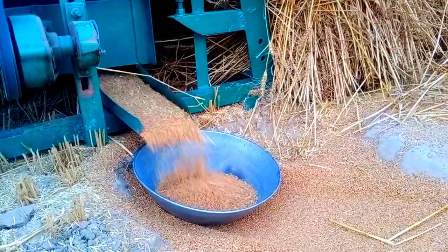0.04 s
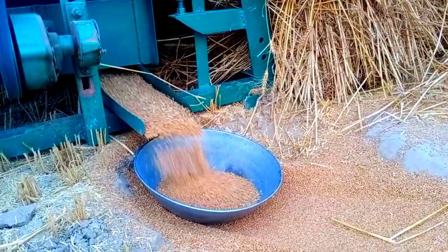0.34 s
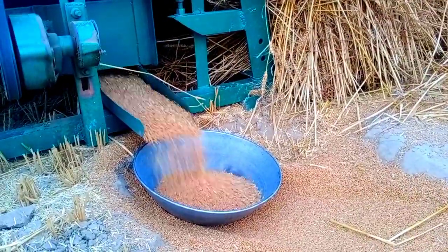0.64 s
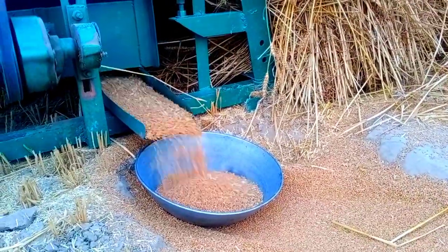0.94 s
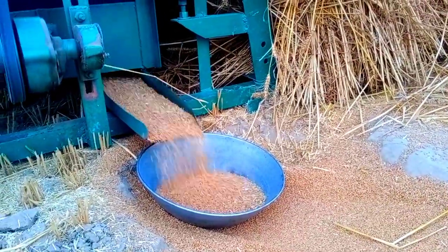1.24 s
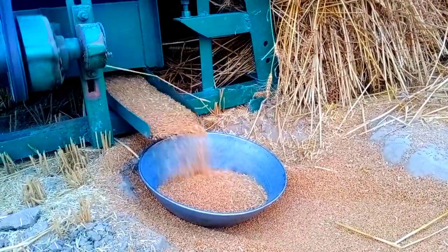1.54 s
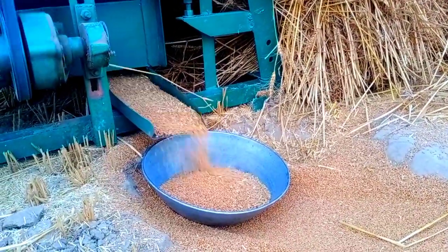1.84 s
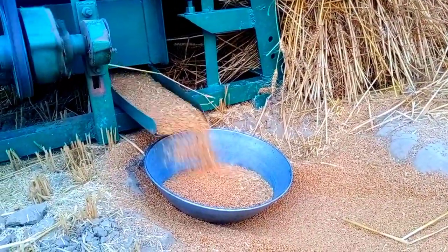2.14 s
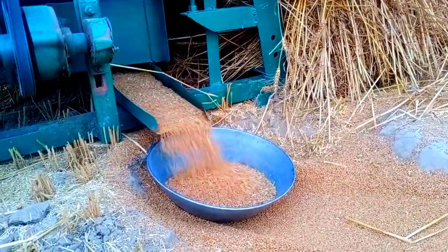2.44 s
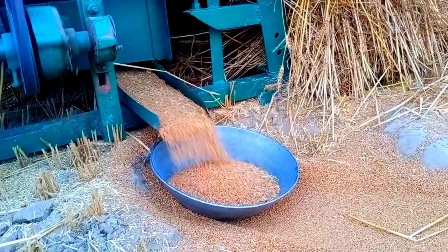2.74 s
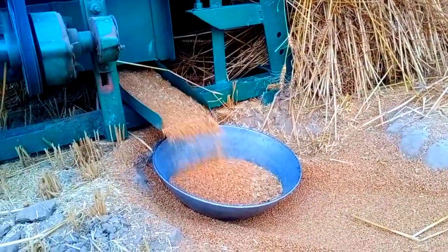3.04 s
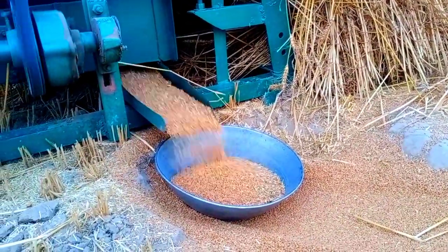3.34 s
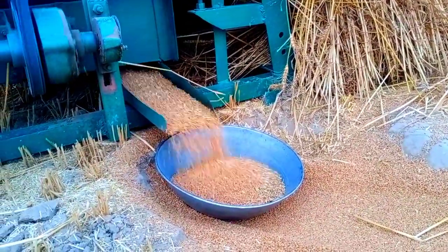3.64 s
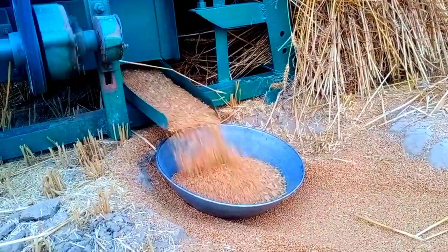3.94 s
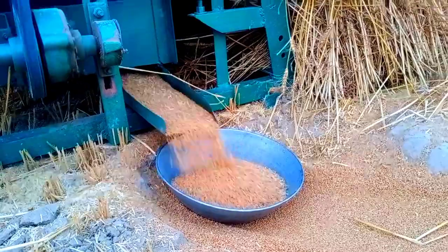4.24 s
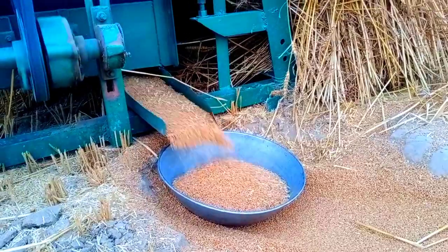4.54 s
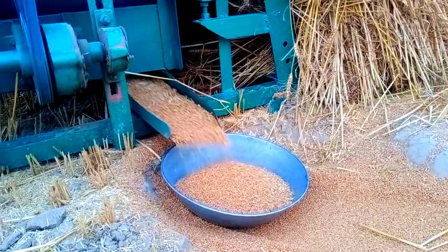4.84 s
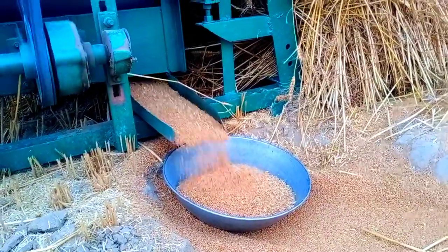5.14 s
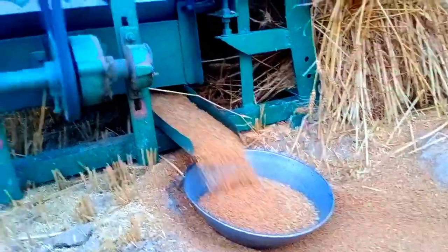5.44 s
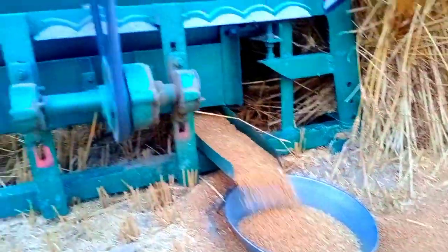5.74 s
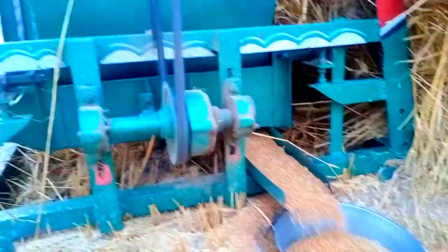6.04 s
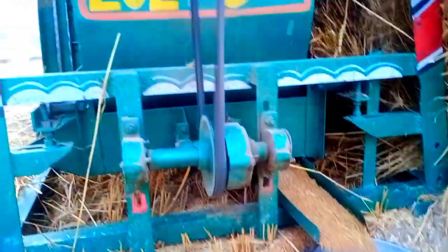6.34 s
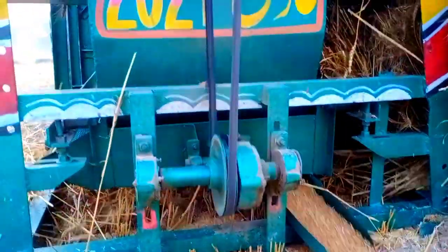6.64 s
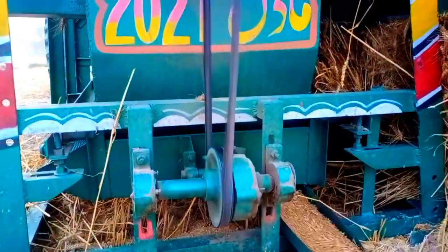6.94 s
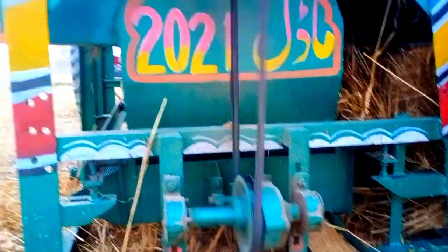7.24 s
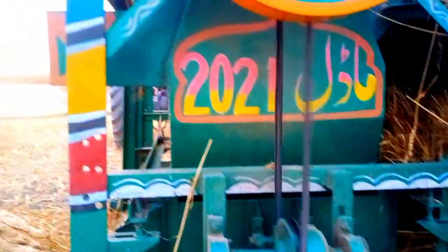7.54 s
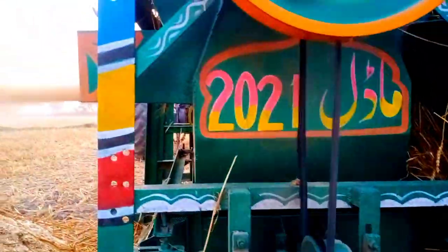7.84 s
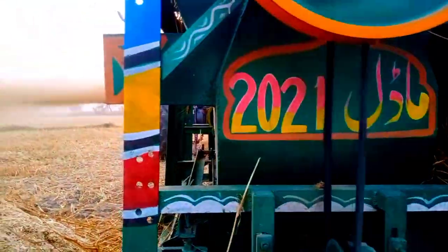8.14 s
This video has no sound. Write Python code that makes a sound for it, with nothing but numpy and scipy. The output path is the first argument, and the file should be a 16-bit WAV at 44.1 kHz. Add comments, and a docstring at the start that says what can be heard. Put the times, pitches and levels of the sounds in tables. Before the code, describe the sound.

A diesel tractor engine runs throughout with a low, throbbing hum, joined by the fan-like roar of the thresher it drives, outdoors and close by. The thresher's sieve knocks about twelve times a second, with uneven thuds, sheet metal clacks and clinks of loose steel. Straw and chaff rush and crackle through the casing, and grain trickles into a metal pan as a faint, high patter with occasional ticks. Around 2 seconds the engine's pitch sags as straw loads the drum, and the rustling briefly brightens. It recovers slightly, then labours and drops further between 4 and 5 seconds. A stalk scrapes briefly on steel at about 5 seconds. The engine then climbs back to speed, while the knocks come harder and more often from 6 to nearly 8 seconds. The pitch starts to sag again at the end, around 8.4 seconds, with everything still running.

```python
"""A low diesel throb and a fan-like roar, outdoors: a tractor drives a wheat thresher through belts.
Periodic exhaust puffs give a harmonic hum, whose pitch sags whenever straw loads the drum; turbulence
at the drum gives the roar. The sieve knocks to and fro about twelve times a second, and its blows
excite the modes of the steel. Chaff rushes through the casing and, at the chute close by, grain
trickles into a pan: both are sums of many small random impacts."""
import sys
import numpy as np
from scipy import signal
from scipy.fft import rfft, irfft, next_fast_len
from scipy.io import wavfile
from scipy.ndimage import uniform_filter1d, minimum_filter1d

SR = 44100
rng = np.random.default_rng(int(sys.argv[2]) if len(sys.argv) > 2 else 0)


def wav_record(signal):
    """Record a signal, one row per channel, as 16-bit PCM in the file named by sys.argv[1]."""
    frames = np.transpose(np.atleast_2d(signal))
    bounded = np.clip(frames, -1, 1)
    # unit amplitude maps onto the largest positive 16-bit level
    quanta = np.round(bounded * 32767).astype(np.int16)
    wavfile.write(sys.argv[1], SR, quanta)


N = 370871
TIME = np.arange(N) / SR

# Spectra of the noises. Each row: frequency in Hz, relative spectral density in dB.
CLICK_SPECTRUM = [(3000, -14.5), (5000, 1), (9000, -3), (12000, 2), (16000, -1)]  # faint broadband clicks in the high treble
HUSK_SPECTRUM = [(2500, -21), (3450, -9), (3750, -0.5), (4050, -13.5), (4600, -13), (6500, -17),
                 (8000, -32.5)]  # dry husks sliding over the sieve
GRAIN_SPECTRUM = [(4000, -26), (7000, -26.5), (10500, -30), (12000, -3.5), (13500, 3), (15000, 5),
                  (16000, -2)]  # falling grain
SCRAPE_SPECTRUM = [(700, -20), (1200, 0), (1650, 2), (1950, -4), (2550, -5), (2900, -16), (3400, -18.5),
                   (3800, -29), (4700, -43), (7000, -67)]  # a stalk on steel
RUSH_SPECTRUM = [(200, -42.5), (350, -4), (450, -3), (590, -4), (740, -1.5), (920, -6), (1080, -5.5),
                 (1250, -5), (1520, -6), (1850, -20), (2300, -49.5), (3000, -37.5), (6000, -62)]  # chaff in the casing
HISS_SPECTRUM = [(900, -15.5), (1700, -4), (2200, 10.5), (2600, -1), (3100, -13.5), (3750, -12),
                 (4150, -18.5), (5600, -16), (6600, -19.5), (7300, -31), (10000, -43.5), (16000, -43.5)]  # dry straw
THUD_SPECTRUM = [(250, -17.5), (420, 1), (560, -1), (720, 0.5), (950, -9), (1400, -23), (3000, -67)]  # the struck frame
CLACK_SPECTRUM = [(750, -17), (1150, 4.5), (1500, 4.5), (1800, -4), (2150, -13.5), (2500, -22), (3000, -35),
                  (3700, -33), (4500, -52.5)]  # struck sheet metal
ROAR_SPECTRUM = [(20, -39), (44, -32.5), (58, -4), (74, -1), (110, 1), (135, -1), (158, -1), (182, 4.5),
                 (215, -5.5), (260, -10), (330, -17), (450, -20), (900, -82.5)]  # air around the drum

# The brightest kernels on bare metal. Each row: start in seconds, frequency in Hz, level in dB.
KERNEL_HITS = [(.286, 14500, -41), (.325, 10700, -61), (.352, 10600, -57), (.687, 14200, -47),
               (0.819, 10760, -57), (1.151, 14900, -49), (1.239, 13400, -57), (1.89, 10760, -61.5),
               (2.614, 14500, -46), (4.141, 14400, -47), (4.906, 15300, -47), (5.937, 14400, -50),
               (6.439, 13500, -49), (7.016, 13600, -52), (7.279, 15400, -44)]
# Chaff in the blower. Each row: time in seconds, rush level in dB, straw hiss level in dB.
CHAFF_LEVELS = [(0.0, -34.5, -57.5), (.8, -35, -57), (2.25, -34, -50), (2.6, -35.5, -58), (3.3, -33.5, -55),
                (4.3, -35, -53), (4.9, -35.5, -57), (5.25, -37.5, -58.5), (6.1, -36.5, -64),
                (6.6, -35.5, -63.5), (7.3, -36.5, -61.5), (7.8, -34.5, -68.5), (8.41, -33, -66)]
# Filter on the stalks' rattle against the casing. Each row: frequency in Hz, relative gain in dB.
RATTLE_RESPONSE = [(1700, 3), (2150, 6.5), (2450, 0), (2750, -4), (3100, -12), (3400, -12), (3750, -14.5),
                   (4200, -28.5), (8000, -45)]
# Modes of the steel. Each row: frequency in Hz, relative level in dB, 60 dB decay time in seconds.
SCRAPED_MODES = [(1567, 3, .04), (2073, 0, .05), (2440, 4, .1), (2590, -4, .05), (2902, -7, .07),
                 (3030, -9, .07), (3338, -6, .06), (3731, -13, .05)]  # excited by scraping straw
PANEL_MODES = [(490, 0, .05), (700, 0, .05), (800, -3, .05), (1160, -5, .05), (1260, -2, .06),
               (1350, -4, .05), (1480, -2, .06), (1640, -6, .05), (1810, -11, .05), (2080, -14, .06),
               (2220, -16, .06), (2442, -19, .2), (3333, -14, .2), (3700, -12, .06)]  # panels and sieve under a clatter
# Loose parts that keep chattering. Each row: frequency in Hz, level in dB relative to the straw hiss.
LOOSE_PARTS = [(1800, 5.5), (1930, 9), (2060, 13.5), (2210, 11.5), (2442, 1.5), (2760, -6), (3333, -10.5),
               (3720, -8.5)]
# The loudest clinks of loose steel. Each row: start in seconds, frequency in Hz, level in dB,
# 60 dB decay time in seconds, roughness from 0 to 1.
LOUD_CLINKS = [(0.153, 2780, -46, 0.06, 0.1), (0.229, 2180, -41, 0.084, 0.6), (.297, 3430, -61, 0.09, 0.1),
               (.31, 2350, -42, .11, 0.3), (.383, 2060, -40.5, .08, .4), (.539, 3340, -52.5, 0.12, 0.05),
               (.705, 2550, -52, 0.15, 0.6), (.772, 2140, -38, 0.12, 0.5), (.77, 3320, -56, 0.088, 0.03),
               (.99, 2150, -38.5, 0.14, .5), (1.0, 3320, -47.5, 0.12, 0.05), (1.79, 2100, -42.5, .1, 0.44),
               (1.907, 2170, -36.5, .11, .4), (2.066, 4540, -47, .04, .2), (2.068, 2150, -37, 0.11, 0.35),
               (2.25, 2280, -39.5, .1, .5), (3.29, 2310, -41, 0.15, 0.54), (3.868, 2840, -49, .12, .4),
               (4.125, 2600, -45.5, 0.12, 0.44), (4.128, 3640, -55.5, .08, 0.4), (4.7, 2310, -44, .08, .6),
               (4.91, 2440, -45.5, .09, .4), (6.06, 2010, -45, 0.09, 0.3), (6.22, 1880, -38.5, .1, 0.5),
               (6.39, 2080, -43, 0.08, .4), (6.467, 1996, -35.5, 0.11, 0.77), (6.541, 2060, -42, 0.067, .5),
               (6.692, 2540, -42, 0.14, 0.64), (6.856, 2730, -45, .08, .7), (6.857, 2120, -35, 0.072, .5),
               (6.91, 2050, -44, 0.068, .5), (7.02, 2150, -40, .1, .4), (7.168, 2700, -50, 0.068, .6),
               (7.222, 1454, -30, .07, .3), (7.252, 2056, -38, .07, 0.34), (7.33, 2050, -45, .07, .4),
               (7.404, 1850, -36.5, 0.077, .3), (7.72, 1780, -33, 0.08, 0.2)]
# The sieve's hardest knocks. Each row: start in seconds, frame thud in dB, sheet metal clack in dB.
HARD_KNOCKS = [(.004, -24.5, -22.5), (0.154, -26, -34.5), (0.304, -29, -30), (0.382, -37, -32.5),
               (0.458, -34, -40.5), (0.615, -32.5, -36), (.77, -35, -33.5), (1.536, -35, -30.5),
               (1.612, -37, -31.5), (2.004, -39.5, -28.5), (2.064, -40, -30), (2.324, -25, -40.5),
               (2.664, -35, -30), (2.816, -27.5, -33), (3.225, -37.5, -34), (3.305, -26.5, -39.5),
               (3.477, -33.5, -33), (3.627, -25, -29), (4.121, -28.5, -26.5), (5.349, -27.5, -34.5),
               (5.985, -23.5, -37), (6.062, -25.5, -33.5), (6.141, -28, -34.5), (6.225, -27.5, -35),
               (6.466, -25.5, -30), (6.54, -29.5, -31), (6.625, -27, -37.5), (6.691, -30, -33),
               (6.857, -28, -32), (6.954, -30, -36.5), (7.016, -27, -41), (7.246, -38, -33.5),
               (7.326, -26, -30.5), (7.405, -33.5, -33.5), (7.478, -30.5, -32), (7.567, -27.5, -33.5),
               (7.647, -44, -31), (7.723, -36, -36.5), (8.186, -34, -43), (8.261, -40, -42),
               (8.337, -33, -39)]

# Shadow of the steel side as the listener moves. Each row: time in seconds, treble gain in dB.
TREBLE_SHADOW = [(6.4, -3.5), (7.0, -5.5), (7.8, -4.5), (8.41, -5)]
# Two bands where reflections interfere with the direct sound, moving with the listener.
# Each row: time in seconds, centre frequency in Hz, gain at the centre in dB.
LOW_NOTCH = [(0, 970, -3.5), (4.3, 986, -3), (4.7, 1015, -8.5), (6.1, 1044, -6.5), (6.5, 894, -3.5),
             (7.5, 883, -5)]
HIGH_NOTCH = [(6.1, 1900, 2), (6.6, 1886, -4.5), (7.15, 1820, -5.5), (7.45, 1404, -1.5), (7.8, 1420, -14),
              (8.41, 1410, -18)]

# Three armfuls of straw load the drum. Each row: time in seconds, load from 0 to 1.
DRUM_LOAD = [(0, 0.19), (1.2, 0), (1.75, 0.18), (2.08, 0.49), (2.45, 0.12), (3.65, 0.15), (4.0, 0.78),
             (4.2, 0.86), (4.36, 0.9), (4.52, 0.01), (5.5, 0), (7.7, 0.02), (8.41, 0.42)]
# Faint tones of the drum and fan. Each row: multiple of the firing rate, level in dB.
WHIRR_TONES = [(1.68, -45), (5.65, -47), (6.25, -53.5)]
# Engine speed, sagging under load. Each row: time in seconds, firing rate in Hz.
FIRING_RATE = [(0.0, 51.15), (0.36, 50.94), (0.75, 51.14), (1.28, 50.84), (1.71, 50.04), (2.24, 47.43),
               (2.55, 47.23), (3.03, 47.96), (3.67, 48.6), (3.96, 48.05), (4.49, 45.18), (4.84, 44.88),
               (5.33, 45.7), (6.37, 48.75), (7.12, 50.38), (7.77, 50.78), (8.41, 48.11)]
# Exhaust hum. Each row: harmonic number, level in dB unloaded at the usual speed, dB added per Hz of
# extra firing rate, dB added by full load, roughness from 0 to 1.
HUM_HARMONICS = [(1, -36, 1.7, -4.5, 0.05), (2, -18.5, 0.61, -11.5, 0.09), (3, -26, -1.5, 4.5, 0.14),
                 (4, -32, 1, 12, .2), (5, -35, 1.32, -3, .28), (6, -37.5, -0.13, 4, .32)]
# The buzz above the hum. Each row: harmonic number, base level in dB.
BUZZ_HARMONICS = [(7, -46), (8, -45.5), (9, -48), (10, -50.5), (11, -54)]
# Rise and fall of that buzz. Each row: time in seconds, gain in dB.
BUZZ_GAIN = [(0, -4.5), (1.1, -18), (1.7, 3.5), (3.7, 3), (5.3, -2.5), (7.1, 3.5), (8.41, 6.5)]


def amp(db):
    """Amplitude grows tenfold for every 20 dB."""
    return 10 ** (np.asarray(db) / 20)


def unit(x):
    """Normalisation to rms 1."""
    return x / np.sqrt(np.mean(x ** 2) + 1e-20)


def curves(rows):
    """Linear interpolation in time of each column after the first."""
    s, *columns = np.transpose(rows)
    return [np.interp(TIME, s, column) for column in columns]


def colour(x, spectrum):
    """Filtering as multiplication in the frequency domain; rms 1."""
    size = next_fast_len(N + 4096)
    hz, db = np.transpose(spectrum)
    gain = amp(np.interp(np.log(np.fft.rfftfreq(size, 1 / SR) + 1), np.log(hz), db))
    return unit(irfft(rfft(x, size) * gain, size)[:N])


def noise(spectrum):
    """Filtered white noise takes on the spectrum of its filter."""
    return colour(rng.standard_normal(N), spectrum)


def wander(rate_hz):
    """Low-passed noise gives a slow random fluctuation of rms 1."""
    size, control_hz = 4096, 400
    hz = np.fft.rfftfreq(size, 1 / control_hz)
    slow = irfft(rfft(rng.standard_normal(size)) / (1 + (hz / rate_hz) ** 2))
    return unit(np.interp(TIME, np.arange(size) / control_hz, slow))


def patchy(x, depth_db):
    """Random spectral modulation, in patches a few hundred Hz wide and some 60 ms long; rms 1."""
    spectra = signal.stft(x, nperseg=1024, noverlap=768)[2]
    field = uniform_filter1d(rng.standard_normal(spectra.shape), size=6, axis=0)
    field = uniform_filter1d(field, size=11, axis=1)
    spectra = spectra * amp(depth_db * unit(field))
    return unit(signal.istft(spectra, nperseg=1024, noverlap=768)[1][:N])


def impacts(per_s, spread_db):
    """Shot noise: independent impulses of uneven size; rms 1."""
    size = amp(spread_db * np.minimum(rng.exponential(1, N), 4)) * rng.choice([-1, 1], N)
    return unit(size * (rng.random(N) < per_s / SR))


def add(mix, s, sound):
    """Superposition of a sound on the mix, starting at s seconds."""
    part = mix[max(round(s * SR), 0):][:len(sound)]
    part += sound[:len(part)]


def swell(age, rise, decay):
    """Envelope of a damped vibration: a quick rise, then exponential decay."""
    return (1 - np.exp(-age / rise)) * np.exp(-age / decay)


def ring(force, hz, t60):
    """One mode of a steel part responds to a force as a damped oscillator."""
    pole = np.exp((2j * np.pi * hz - np.log(1000) / t60) / SR)
    return np.sqrt(1 - abs(pole) ** 2) * signal.lfilter([1], [1, -pole], force).imag


def clink(hz, t60=.09, rough=.15, spread=.03, rise_share=1 / 12):
    """Three close modes of struck metal beat as they decay; narrow-band noise is its chatter."""
    age = np.arange(SR // 5) / SR
    modes_hz = hz * (1 + spread * rng.uniform(-1, 1, (3, 1)) * [[0], [1], [2]])
    tone = np.array([1, .55, .35]) @ np.sin(2 * np.pi * (modes_hz * age + rng.random((3, 1))))
    band = signal.butter(3, [.84 * hz, 1.07 * hz], "bandpass", fs=SR, output="sos")
    chatter = unit(signal.sosfilt(band, rng.standard_normal(len(age))))
    return (tone + rough * chatter) * swell(age, t60 * rise_share, t60 / np.log(1000))


def treble_clicks(level_db=-87):
    """Sparse shot noise is heard as separate, faint broadband clicks in the high treble."""
    return amp(level_db) * colour(impacts(per_s=18, spread_db=5), CLICK_SPECTRUM)


def husks(level_db=-81):
    """Dense shot noise: the impacts of husks sliding over the sieve fuse into a light sizzle."""
    slide = colour(impacts(per_s=1500, spread_db=2), HUSK_SPECTRUM)
    return amp(level_db) * patchy(slide, depth_db=3)


def grain(shake, hiss_db, patter_db=-70, ticks_db=-73, clumps_db=2.5, follows_straw=.24):
    """Modulated shot noise: wheat patters into the pan in clumps, and strays tick on bare metal."""
    clumps = amp(clumps_db * wander(rate_hz=22) + follows_straw * hiss_db)
    flow = unit((.75 + .25 * shake) * clumps)
    tick = swell(np.arange(SR // 25) / SR, rise=.0003, decay=.002)
    ticks = unit(signal.oaconvolve(abs(impacts(per_s=40, spread_db=4.5)), tick)[:N])
    patter = colour(impacts(per_s=6000, spread_db=2), GRAIN_SPECTRUM)
    return flow * (amp(patter_db) * patter + amp(ticks_db) * ticks * noise(GRAIN_SPECTRUM))


def kernels():
    """Brief contact excites high modes: single kernels tick off the bare rim of the pan."""
    out = np.zeros(N)
    for s, hz, db in KERNEL_HITS:
        add(out, s, amp(db) * clink(hz, t60=.022, spread=.035))
    return out


def stalk_scrape(at_s=5.089, slips_s=.008, slips_db=-41.5, scrape_s=.028, scrape_db=-39):
    """Stick-slip friction: a stalk scrapes once along the steel, and its slips ring the panel."""
    stroke = amp(slips_db) * np.exp(1 - np.hypot((TIME - at_s) / slips_s, 1).clip(max=40))
    lowpass = signal.butter(8, 3600, fs=SR, output="sos")
    slips = signal.sosfilt(lowpass, stroke * impacts(per_s=2500, spread_db=1))
    scrape = amp(scrape_db) * np.exp(-((TIME - at_s) / scrape_s) ** 2) * noise(SCRAPE_SPECTRUM)
    return scrape + sum(amp(db) * ring(slips, hz, t60) for hz, db, t60 in SCRAPED_MODES)


def stalk_pings(shake, count=950, low_hz=1700, high_hz=3900, range_db=13, t60=.12):
    """Each stalk end excites one damped mode of the casing, more strongly when the sieve throws it."""
    age, out = np.arange(SR // 7) / SR, np.zeros(N)
    for when, place, size, length in rng.random((count, 4)):
        hz = low_hz * (high_hz / low_hz) ** place
        fade = swell(age, rise=.005, decay=t60 * (.5 + length) / np.log(1000))
        strength = amp(range_db * size) * np.sqrt(shake[int(when * N)])
        add(out, when * N / SR, strength * fade * np.sin(2 * np.pi * hz * age))
    return out


def chaff(shake, firings, rush_db, hiss_db, tossed=.074, throb=.073, rattle_db=-1, crackle_db=-5):
    """Shot noise of straw on the casing, modulated by sieve and engine; dry stalks rattle and crackle."""
    pulsation = 1 + throb * np.cos(4 * np.pi * firings)  # twice per firing
    pelting = impacts(per_s=5000, spread_db=1.5) * shake ** tossed * pulsation
    rush = amp(rush_db) * patchy(colour(pelting, RUSH_SPECTRUM), depth_db=2.5)
    crackle = patchy(colour(impacts(per_s=12000, spread_db=2), HISS_SPECTRUM), depth_db=3.2)
    rattle = colour(stalk_pings(shake), RATTLE_RESPONSE)
    return rush + amp(hiss_db) * (amp(rattle_db) * rattle + amp(crackle_db) * crackle)


def loose_parts(hiss_db, count=300, range_db=6, scatter=.0064):
    """Free vibration of loose steel: loud clinks, and many faint ones as straw jostles a few parts."""
    out = np.zeros(N)
    for s, hz, db, t60, rough in LOUD_CLINKS:
        add(out, s, amp(db) * clink(hz, t60, rough, rise_share=1 / 30))
    for when, part, size, detune in rng.random((count, 4)):
        hz, db = LOOSE_PARTS[int(part * len(LOOSE_PARTS))]
        level_db = hiss_db[int(when * N)] + db + range_db * size
        add(out, when * N / SR, amp(level_db) * clink(hz * (1 + scatter * (2 * detune - 1))))
    return out


def sieve_shake(strokes, uneven_db=8.5, return_db=-3.5):
    """Envelope of reciprocating motion: the sieve throws its load at each end, softer on the return."""
    count = strokes.astype(int)
    strength_db = uneven_db * rng.uniform(-1, 1, 256)[count] + return_db * (count % 2)
    return unit(amp(strength_db) * swell(strokes % 1, rise=.14, decay=.28))


def panel_rattle(shake, rush_db, rattle_db=-12, uneven_db=4):
    """Each stroke rattles the panels; blows landing in different places favour different modes."""
    blows = shake * impacts(per_s=4000, spread_db=1.5)
    ringing = sum(amp(db) * ring(blows * amp(uneven_db * wander(rate_hz=10)), hz, t60)
                  for hz, db, t60 in PANEL_MODES)
    damping = signal.butter(7, 2350, fs=SR, output="sos")  # packed straw deadens the treble
    return amp(rush_db + rattle_db) * unit(signal.sosfilt(damping, ringing))


def sieve_knocks(strokes, tap_thud_db=-37, tap_clack_db=-40.5, uneven_db=.5, rebound_db=-42):
    """Impact excitation: the sieve hits its stops with a thud and a clack, then softly rebounds."""
    age = np.arange(SR // 8) / SR
    thuds, clacks = np.zeros((2, N))
    ends = TIME[1:][np.diff(strokes.astype(int)) > 0]
    rebounds = TIME[1:][np.diff(np.floor(strokes - .5)) > 0]  # half a stroke later
    hard_times = np.transpose(HARD_KNOCKS)[0]
    tap_levels = [tap_thud_db, tap_clack_db] + uneven_db * rng.uniform(-1, 1, (len(ends), 2))
    # An ordinary tap ends every stroke that has no hard knock.
    taps = [(s, *levels) for s, levels in zip(ends, tap_levels) if abs(hard_times - s).min() > .03]
    for s, thud_db, clack_db in list(HARD_KNOCKS) + taps:
        add(thuds, s, amp(thud_db) * swell(age, rise=.0016, decay=.017))
        add(clacks, s, amp(clack_db) * swell(age, rise=.0016, decay=.021))
    for s in rebounds:
        add(thuds, s, amp(rebound_db) * swell(age, rise=.001, decay=.01))
    frame = thuds * patchy(noise(THUD_SPECTRUM), depth_db=1)
    sheet_metal = clacks * patchy(noise(CLACK_SPECTRUM), depth_db=4.5)
    return frame + sheet_metal


def shadowed(x, corner_hz=1160):
    """Acoustic shadow: the machine's side dims the treble, while long waves diffract around it."""
    shadow_db, = curves(TREBLE_SHADOW)
    low = signal.sosfiltfilt(signal.butter(3, corner_hz, fs=SR, output="sos"), x)
    return low + amp(shadow_db) * (x - low)


def notched(x, width_hz=80):
    """Interference: reflections from ground and casing carve moving notches into the clatter."""
    hz, s, spectra = signal.stft(x, SR, nperseg=1024, noverlap=768)
    for notch in (LOW_NOTCH, HIGH_NOTCH):
        at, centre_hz, gain_db = np.transpose(notch)
        offset = (hz[:, None] - np.interp(s, at, centre_hz)) / width_hz
        spectra = spectra * amp(np.interp(s, at, gain_db) * np.exp(-offset ** 2))
    return signal.istft(spectra, SR, nperseg=1024, noverlap=768)[1][:N]


def drum(firings, load, unloaded_db=-26, load_db=5, throb=.3, uneven_db=2.04):
    """Turbulence at the beaters roars, louder under load and throbbing with the engine, over a whirr."""
    air = rng.standard_normal(N) * (1 + throb * np.cos(2 * np.pi * firings))
    whirr = sum(amp(db) * np.sqrt(2) * np.cos(2 * np.pi * (k * firings + rng.random()))
                for k, db in WHIRR_TONES)
    roar_db = unloaded_db + load_db * load + uneven_db * wander(rate_hz=2.5)
    return amp(roar_db) * colour(air, ROAR_SPECTRUM) + whirr


def exhaust(firings, firing_hz, load, usual_hz=48, jitter=.00092, buzz_rough=.18,
            dip_s=4.385, dip_width_s=.014, dip_db=-12.5):
    """One puff per firing makes a harmonic series, shaped by speed and load, rough from uneven burning."""
    buzz_db, = curves(BUZZ_GAIN)
    hum = [(k, db + per_hz * (firing_hz - usual_hz) + load_db * load, rough)
           for k, db, per_hz, load_db, rough in HUM_HARMONICS]
    buzz = [(k, db + buzz_db, buzz_rough) for k, db in BUZZ_HARMONICS]
    cycles = firings + jitter * wander(rate_hz=6.9)
    out = np.zeros(N)
    for k, db, rough in hum + buzz:
        lead = np.pi / k ** 1.5  # the open pipe is a high-pass: its lowest harmonics come early
        dispersion = k ** 2  # the silencer delays each harmonic differently, rounding the puff
        scatter = rng.random() if k > len(hum) else 0  # reflections smear the buzz
        phase = 2 * np.pi * (k * cycles + scatter) + lead + dispersion
        in_phase = 1 + rough * wander(rate_hz=45)
        quadrature = rough * wander(rate_hz=10)
        out += amp(db) * (in_phase * np.cos(phase) + quadrature * np.sin(phase))
    dip = amp(dip_db * np.exp(-((TIME - dip_s) / dip_width_s) ** 2))  # a brief dip near peak load
    return np.sqrt(2) * out * dip


def scene(strokes_per_firing=.2567, start_stroke=.95):
    """The sources superpose; belts lock the drum and sieve to the engine's firing rate."""
    firing_hz, = curves(FIRING_RATE)
    load, = curves(DRUM_LOAD)
    rush_db, hiss_db = curves(CHAFF_LEVELS)
    firings = np.cumsum(firing_hz) / SR
    strokes = start_stroke + strokes_per_firing * firings
    shake = sieve_shake(strokes)
    metal = panel_rattle(shake, rush_db) + sieve_knocks(strokes) + loose_parts(hiss_db)
    straw = chaff(shake, firings, rush_db, hiss_db) + stalk_scrape()
    drive = exhaust(firings, firing_hz, load) + drum(firings, load)
    clatter = notched(shadowed(metal + straw))
    return (drive + clatter + treble_clicks() + husks() + grain(shake, hiss_db) + kernels())[None]


def record(dry, ceiling_db=-9, fade_s=.003, cutoff_hz=15850):
    """Peak limiting by a fast, smoothed gain, then a short fade-out and a low-pass band limit."""
    allowed = np.minimum(1, amp(ceiling_db) / (abs(dry[0]) + 1e-9))
    gain = minimum_filter1d(allowed, size=900)
    gain = uniform_filter1d(uniform_filter1d(gain, size=600), size=600)
    lowpass = signal.firwin(511, cutoff_hz, window=("kaiser", 9), fs=SR)
    fade = np.minimum(1, (TIME[-1] - TIME) / fade_s)
    return signal.oaconvolve(dry * gain * fade, lowpass[None], "same")


dry = scene()
out = record(dry)
wav_record(out)
```